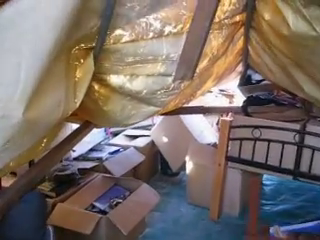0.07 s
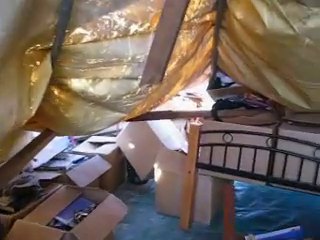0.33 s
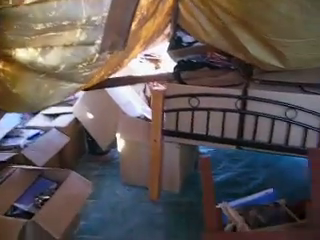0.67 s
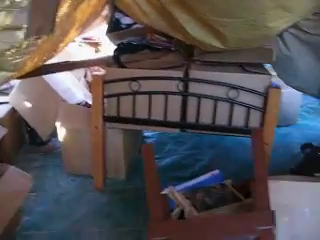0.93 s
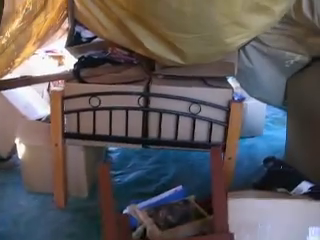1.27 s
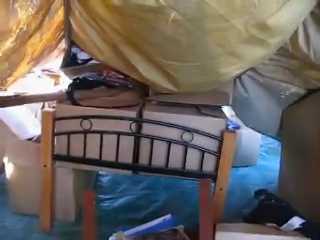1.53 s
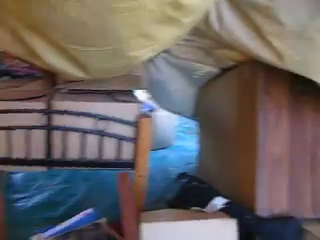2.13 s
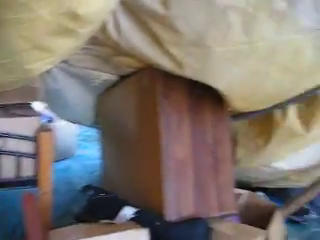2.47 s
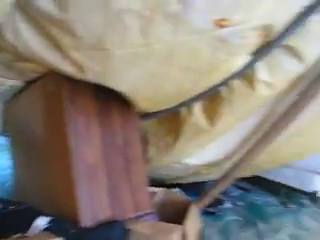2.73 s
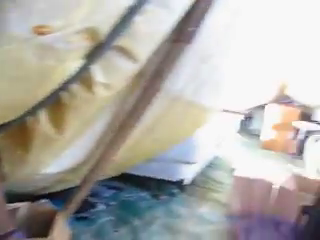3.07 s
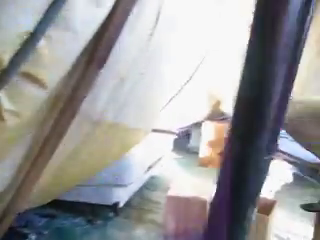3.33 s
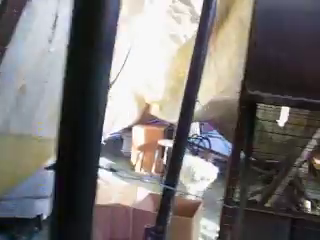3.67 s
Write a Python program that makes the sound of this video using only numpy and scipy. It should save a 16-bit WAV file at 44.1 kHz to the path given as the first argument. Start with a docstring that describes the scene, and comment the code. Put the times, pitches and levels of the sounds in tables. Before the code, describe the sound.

Gusts of wind rumble on the microphone while tent fabric flaps and boxes bump.

```python
"""Inside a collapsed tent, wind hisses and two faint knocks sound. Then a gust buffets the microphone,
loose sheeting swishes and slaps, and boxes and boards knock under it. In a lull near 1.5 s, cloth
rubs over a box and scrapes over an edge, and a thin hiss comes up. Near 2 s, metal clinks and a
strong gust hits; then stiff creases snap twice. Weaker gusts, swishes and knocks go on to the end.
All along, the clutter gives the sheeting and debris a short, dry echo."""
import sys
import numpy as np
from scipy import signal
from scipy.fft import rfft, irfft
from scipy.io import wavfile

SR = 44100
rng = np.random.default_rng(int(sys.argv[2]) if len(sys.argv) > 2 else 0)


def unload_audio(sound):
    """Save the sound as a 16-bit wav file, at the path given as the first command line argument."""
    columns = np.transpose(np.atleast_2d(sound))
    # keep every value between -1 and 1, then stretch to whole-number steps
    steps = np.round(np.clip(columns, -1, 1) * 32767)
    wavfile.write(sys.argv[1], SR, steps.astype(np.int16))


N = 163170

# Levels are relative. A fade time (t60) is how long a sound takes to drop by 60 dB.
# tone of the wind hissing outside (frequency [Hz], level [dB])
HISS_TONE = [(30, 15.5), (200, 6.5), (900, -0.5), (2500, -7.5), (4000, -8.5), (5000, -11), (9500, -8.5),
             (12500, -11)]
# swell of that hiss (time [s], level [dB])
HISS_SWELL = [(0, -44), (.6, -44), (.8, -39), (1.3, -43), (2.1, -42.5), (2.48, -46.5), (3.12, -42.5),
              (3.36, -45.5), (3.7, -40.5)]
# swell of a thin, narrow hiss (time [s], level [dB])
THIN_SWELL = [(1.3, -70), (1.5, -48), (1.88, -51), (2.25, -71)]
# cloth dragging over a box (time [s], level [dB])
RUB_SWELL = [(1.35, -76), (1.38, -43), (1.455, -38), (1.49, -78)]
# weave dragging over an edge (time [s], level [dB])
SCRAPE_SWELL = [(1.36, -64), (1.405, -44), (1.475, -60), (1.495, -38.5), (1.53, -42.5), (1.59, -67)]
# ring of the metal (frequency [Hz], level [dB], fade time [s])
CLINK_RING = [(4540, 6, 0.14), (5087, 0, 0.17), (7500, 2, 0.29), (8328, 9, 0.11), (9400, 1, .13)]
# creases snapping (time [s], level [dB], fade time [s])
CREASE_SNAPS = [(2.102, -31.5, 0.11), (2.534, -29, 0.23)]
# tone of a snap (frequency [Hz], level [dB])
SNAP_TONE = [(200, -2.5), (2300, -0.5), (3800, -7.5), (5000, -15), (10000, -42)]
# ring of a snap (frequency [Hz], level [dB], fade time [s])
SNAP_RING = [(1350, -1.5, 0.028), (2324, 2, 0.033), (3790, -3.5, 0.048)]
# sheeting sliding (time [s], rise [s], hold [s], level [dB], treble tilt [dB per octave])
SHEET_SWISHES = [(0.263, 0.0046, 0.066, -32, 0), (0.318, .005, .004, -33, 1),
                 (0.355, 0.018, 0.033, -32.5, 3), (0.858, 0.03, 0.044, -41, 7.5),
                 (1.09, 0.022, 0.0097, -29, 0.5), (1.274, 0.0047, 0.018, -36.5, 3.5),
                 (1.368, 0.041, 0.088, -35.5, 2.5), (1.511, .02, 0.11, -47.5, -3),
                 (1.9, 0.09, 0.037, -40, -1), (2.555, 0.0051, 0.052, -37.5, -7),
                 (2.961, .008, .012, -45, 6), (3.395, 0.036, 0.016, -34, 4), (3.543, 0.0069, .004, -43, 1),
                 (3.677, 0.0045, 0.025, -34, -8.5)]
# tone of the sliding sheeting (frequency [Hz], level [dB])
SHEET_TONE = [(100, -15), (400, 8), (800, 2.5), (2200, 2.5), (3800, 1.5), (4800, -3.5), (10000, -6.5),
              (12500, -12.5)]
# sheeting slaps and debris knocks (time [s], level [dB], dull above [Hz], fade time [s], pitch [Hz])
BLOWS = [(.026, -38, 870, .08, 698), (.091, -37.5, 1030, .06, 428), (.279, -28.5, 1760, 0.4, 870),
         (.321, -24, 1470, 0.1, 620), (.392, -15, 2170, 0.052, 851), (.408, -24.5, 2300, 0.088, 528),
         (.52, -23, 2280, .13, 766), (.688, -28.5, 1180, 0.055, 1038), (.711, -32.5, 1830, 0.18, 744),
         (.748, -32.5, 800, 0.064, 547), (.868, -28.5, 1640, 0.18, 663), (1.273, -25.5, 1430, 0.14, 545),
         (1.476, -27.5, 1160, 0.16, 833), (1.52, -27, 1920, .12, 737), (1.562, -25.5, 2090, 0.087, 532),
         (1.605, -30, 1100, 0.07, 767), (1.628, -32.5, 1030, 0.082, 720), (1.851, -35.5, 830, 0.11, 530),
         (1.912, -32, 1620, 0.28, 566), (1.939, -28.5, 2000, 0.11, 550), (1.975, -25, 1530, 0.062, 915),
         (2.284, -40, 990, 0.056, 744), (2.356, -25, 1630, 0.1, 754), (2.581, -36, 1210, 0.31, 680),
         (2.928, -35.5, 1530, 0.33, 564), (2.954, -25.5, 820, 0.08, 561), (2.963, -24.5, 2300, 0.12, 787),
         (3.141, -29, 1010, 0.091, 575), (3.213, -32, 1660, 0.16, 720), (3.303, -39.5, 1710, .26, 785),
         (3.351, -35.5, 1720, 0.31, 802), (3.685, -32, 1690, 0.15, 850)]
# tone of a knock (frequency [Hz], level [dB])
KNOCK_TONE = [(60, -5), (400, 2), (800, 0), (1300, -4.5), (4000, -7), (10000, -17.5)]
# pitches at which the clutter rings (frequency [Hz], width [Hz], level [dB])
CLUTTER_RING = [(604, 84, -4.7), (823, 33, -0.95)]
# strength of the wind at the microphone (time [s], level [dB])
GUSTS = [(0, -57), (.14, -41), (.23, -17), (.33, -26), (.39, -17.5), (.51, -14), (.62, -19), (.69, -27.5),
         (.72, -19.5), (.81, -20), (.86, -26), (.94, -29), (1.0, -21), (1.09, -21), (1.15, -36), (1.2, -21),
         (1.3, -20.5), (1.38, -40.5), (1.43, -28), (1.72, -35.5), (1.79, -18.5), (1.95, -20), (2.0, -27),
         (2.06, -13), (2.12, -22), (2.24, -23.5), (2.33, -34.5), (2.39, -18), (2.48, -40), (2.53, -27),
         (2.63, -35.5), (2.68, -18), (2.85, -37), (2.92, -34.5), (3.0, -22), (3.08, -27.5), (3.13, -39),
         (3.28, -26.5), (3.34, -39), (3.39, -24.5), (3.47, -30.5), (3.55, -44), (3.64, -29.5), (3.7, -40)]
# tone of the rumbling air (frequency [Hz], level [dB])
RUMBLE_TONE = [(10, -21), (55, 5.5), (90, 2.5), (130, -4.5), (190, -13), (300, -24), (500, -38),
               (1000, -65)]
# sharpness of the rumble, lower as the microphone turns out of the draught (time [s], level [dB])
SHARPNESS = [(2.1, -4), (2.35, -11.5), (3.7, 0)]
# single swirls of air that thump the microphone (time [s], peak level [dB], half width [s])
SWIRLS = [(0.394, -5.5, 0.0024), (.435, -16, 0.0025), (.459, -14, 0.002), (0.498, -6.5, 0.0018),
          (0.719, -11.5, 0.0032), (0.797, -15, 0.0022), (1.028, -21, 0.0018), (1.273, -18.5, 0.0016),
          (1.301, -14, 0.00097), (1.851, -9.5, 0.0029), (1.926, -13, 0.0024), (2.036, -8.5, 0.0012),
          (2.073, -7, 0.0015), (2.382, -11.5, 0.0035), (2.682, -15.5, 0.0023), (3, -13, 0.0022),
          (3.243, -15, 0.0016), (3.383, -14, 0.0043)]
# the microphone's loss of top treble (frequency [Hz], level [dB])
MIC_TONE = [(10000, -1.5), (10800, -6.5), (11400, -12), (12000, -21), (12500, -40)]


def amp(db):
    """Turns decibels into a number to multiply by."""
    return 10 ** (np.asarray(db) / 20)


def unit(x):
    """Scales a signal to an average strength (rms) of 1."""
    return x / np.sqrt(np.mean(x ** 2) + 1e-20)


def swell(points):
    """Joins (time, level) points into a level for every sample."""
    return np.interp(np.arange(N) / SR, *np.transpose(points))


def tone(points, hz):
    """How much of each frequency a tone table lets through."""
    f, db = np.transpose(points)
    return amp(np.interp(np.log(hz + 1), np.log(f + 1), db))


def shape(x, gain):
    """Turns each frequency f up or down by gain(f), then scales to strength 1."""
    return unit(irfft(rfft(x) * gain(np.fft.rfftfreq(len(x), 1 / SR)), len(x)))


def noise(size, gain):
    """Random noise with a chosen tone."""
    return shape(rng.standard_normal(size), gain)


def wobble(size, hz):
    """Random movement, up to about hz times a second."""
    return noise(size, lambda f: 1 / (1 + (f / hz) ** 4))


def band(hz, width_hz):
    """Noise gathered around one pitch."""
    return noise(N, lambda f: 1 / (1 + (2 * (f - hz) / width_hz) ** 2))


def steadied(x, span_s):
    """Evens out the slow chance swells of a noise."""
    window = signal.windows.hann(int(span_s * SR))
    power = signal.fftconvolve(x ** 2, window / window.sum(), "same")
    return x / np.sqrt(abs(power) + 1e-9)


def ticks(size, per_s=9000):
    """Dense tiny clicks of uneven strength."""
    strength = amp(np.minimum(rng.exponential(1, size), 4))
    return strength * rng.standard_normal(size) * (rng.random(size) < per_s / SR)


def ringing(notes, t):
    """Pure notes that die away together, each at its own speed."""
    return sum(amp(db - 60 * t / t60) * np.sin(2 * np.pi * (hz * t + rng.random()))
               for hz, db, t60 in notes)


def add(mix, start_s, sound):
    """Mixes a sound in at a given time."""
    part = mix[round(start_s * SR):][:len(sound)]
    part += sound[:len(part)]


def hiss(stir_db=4, flutter_db=0.95):
    """Wind and far sheeting: smooth treble over an unsteady middle, and a thin hiss for a while."""
    wide = noise(N, lambda f: tone(HISS_TONE, f))
    low = signal.sosfiltfilt(signal.butter(2, 1500, fs=SR, output="sos"), wide)
    middle = low * amp(stir_db * wobble(N, hz=35.7))
    treble = (wide - low) * amp(flutter_db * wobble(N, hz=30.2))
    thin = band(hz=4000, width_hz=1800) * amp(swell(THIN_SWELL))
    return (middle + treble) * amp(swell(HISS_SWELL)) + thin


def tent_echo(x, t60=0.29, db=-9.5, bounces_per_s=2000):
    """Adds sound that bounces off the clutter and is soon soaked up by the cloth."""
    t = np.arange(SR // 3) / SR
    bounces = rng.standard_normal(len(t)) * (rng.random(len(t)) < bounces_per_s / SR)
    bounces *= (t > .005) * amp(-60 * t / t60)
    return x + amp(db) * signal.fftconvolve(x, bounces / np.linalg.norm(bounces))[:N]


def rub():
    """Cloth drags over a box with a low rub."""
    return band(hz=302, width_hz=90) * amp(swell(RUB_SWELL))


def scrape(pitches_hz=(2510, 3110, 3850), grain_db=1.5):
    """Coarse weave drags over an edge: a rasp whose pitch wanders with its speed."""
    speed = 1 + .04 * wobble(N, hz=14)
    travel = np.cumsum(speed) / SR
    rasp = sum(wobble(N, hz=230) * np.sin(2 * np.pi * hz * travel) for hz in pitches_hz)
    return unit(rasp * amp(grain_db * wobble(N, hz=160))) * amp(swell(SCRAPE_SWELL))


def clink(click_t60=0.21, rise_s=0.0094):
    """Metal gives a bright click and rings briefly on a few high notes."""
    t = np.arange(SR // 3) / SR
    click = shape(ticks(len(t)), lambda f: f / (1 + (f / 6000) ** 2)) * amp(15 - 60 * t / click_t60)
    return amp(-40) * (ringing(CLINK_RING, t) + click) * np.minimum(t / rise_s, 1)


def snap(db, t60, rise_s=0.0014):
    """A stiff crease flips over with a bright, briefly ringing crack."""
    t = np.arange(SR // 3) / SR
    crackle = shape(ticks(len(t)), lambda f: tone(SNAP_TONE, f)) * amp(-60 * t / t60)
    return amp(db) * np.minimum(t / rise_s, 1) * (crackle + ringing(SNAP_RING, t))


def swish(rise_s, hold_s, db, tilt_db, t60=0.45, drop_db=5, drop_s=0.025):
    """Creases tick densely as the sheeting slides over itself, then die away."""
    t = np.arange(SR // 2) / SR
    rustle = shape(ticks(len(t)),
                   lambda f: tone(SHEET_TONE, f) * amp(tilt_db * np.log2(np.maximum(f, 800) / 3000)))
    delay_s = 0.00099 * (1 + 0.15 * wobble(len(t), hz=11.3))  # a moving fold reflects the rustle
    rustle = unit(rustle + 0.29 * np.interp(t - delay_s, t, rustle))
    after = np.maximum(t - rise_s - hold_s, 0)
    fade_db = -60 * after / t60 - drop_db * (1 - np.exp(-after / drop_s))  # drops as sliding stops
    flutter_db = 0.98 * wobble(len(t), hz=67)
    return rustle * np.minimum(t / rise_s, 1) * amp(db + fade_db + flutter_db)


def knock(db, dull_hz, t60, hollow_hz, rise_s=.003, hollow_t60=0.07, leak_db=-19.5):
    """A short padded blow into cardboard, wood and cloth, whose hollows ring on briefly."""
    t = np.arange(SR // 3) / SR
    blow = noise(len(t),
                 lambda f: tone(KNOCK_TONE, f) * (1 / np.sqrt(1 + (f / dull_hz) ** 9.3) + amp(leak_db)))
    fade_in, after = np.minimum(t / rise_s, 1), np.maximum(t - rise_s, 0)
    blow = steadied(blow, span_s=0.019) * fade_in * amp(-60 * after / t60)
    body = blow + sum(amp(ring_db) * signal.lfilter(*signal.iirpeak(hz, hz / width, fs=SR), blow)
                      for hz, width, ring_db in CLUTTER_RING)
    body *= np.std(blow) / np.std(body)  # the clutter changes the tone, not the strength
    hollow = np.sin(2 * np.pi * hollow_hz * t) * fade_in * amp(-3 - 60 * after / hollow_t60)
    return amp(db + 0.5) * (body + hollow)


def buffeting(lump_db=3.5, lump_hz=34, sway_hz=46.5, calm_db=-25):
    """Churning air hits the microphone in lumps, with slow pressure swings and single sharp swirls."""
    wind_db = swell(GUSTS)
    gust_db = wind_db - calm_db
    air = steadied(noise(N, lambda f: tone(RUMBLE_TONE, f)), span_s=0.032)
    low = signal.sosfiltfilt(signal.butter(3, 130, fs=SR, output="sos"), air)
    high = (air - low) * amp(swell(SHARPNESS) + 0.69 * gust_db)  # stronger gusts sound brighter
    lumps = np.clip(noise(N, lambda f: f / (1 + (f / lump_hz) ** 5)), -2, 1.5)
    wind = (low + high) * amp(wind_db - 2 + lump_db * lumps)
    sway = steadied(noise(N, lambda f: f / (1 + (f / sway_hz) ** 5)), span_s=0.31)
    wind += sway * amp(-30.5 + 0.72 * gust_db)  # slow swings follow the gusts less
    for time_s, db, half_width_s in SWIRLS:
        offset = (np.arange(N) / SR - time_s) / half_width_s
        wind += amp(db) * (1 - offset ** 2) * np.exp(-offset ** 2 / 2)  # a push between two dips
    return wind


def scene():
    """Sheeting and debris echo in the tent, with the wind around them."""
    tent = rub() + scrape()
    add(tent, start_s=1.975, sound=clink())
    for source, events in ((swish, SHEET_SWISHES), (knock, BLOWS), (snap, CREASE_SNAPS)):
        for start_s, *settings in events:
            add(tent, start_s, source(*settings))
    return (tent_echo(tent) + buffeting() + hiss())[None]


def record(dry, top_hz=12400):
    """The microphone dulls the top treble, and a filter cuts off what lies above top_hz."""
    dull = irfft(rfft(dry) * tone(MIC_TONE, np.fft.rfftfreq(N, 1 / SR)), N)
    treble_cut = signal.firwin(511, top_hz, window=("kaiser", 9), fs=SR)
    return signal.oaconvolve(dull, treble_cut[None], "same")


dry = scene()
out = record(dry)
unload_audio(out)
```